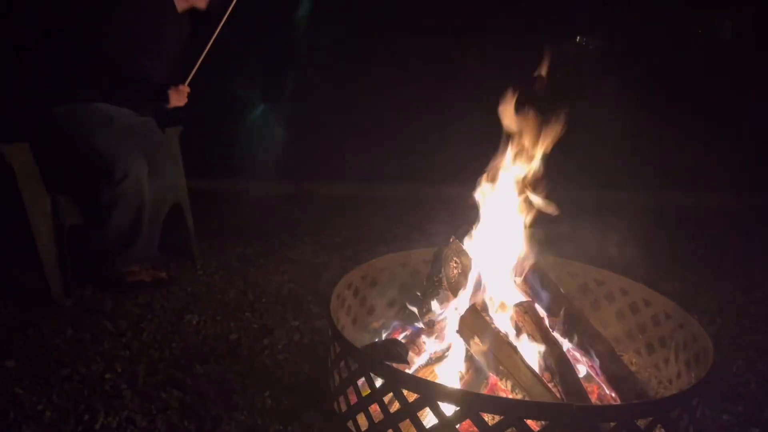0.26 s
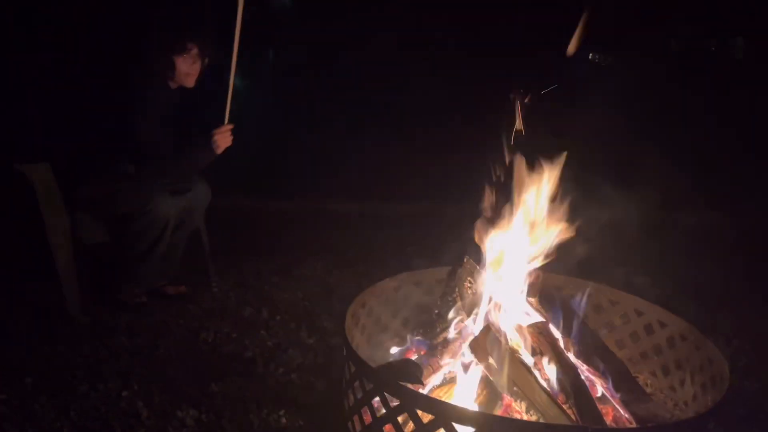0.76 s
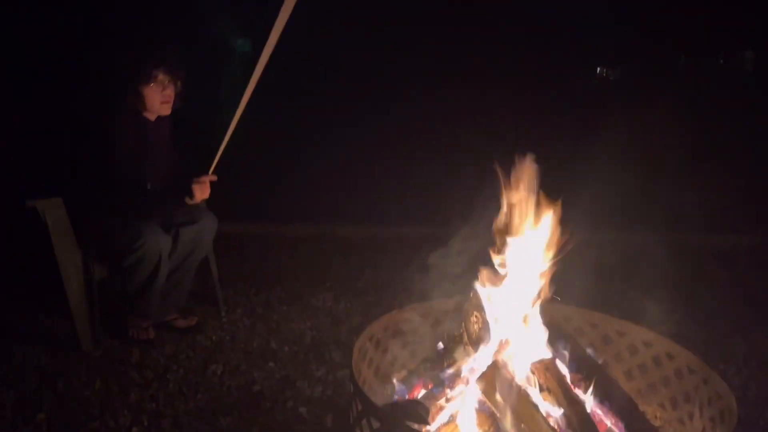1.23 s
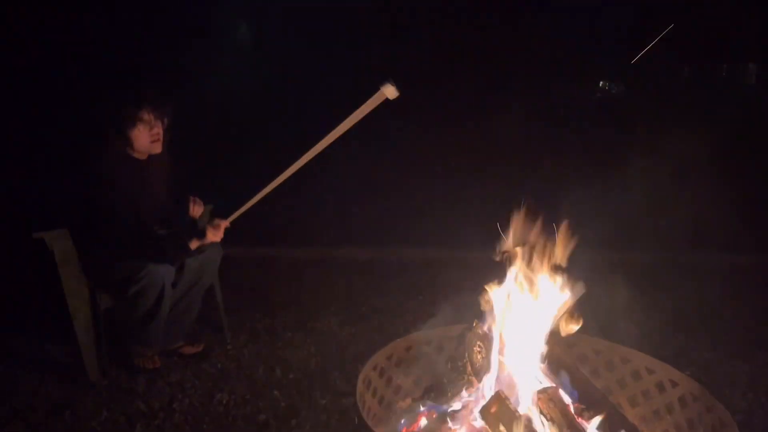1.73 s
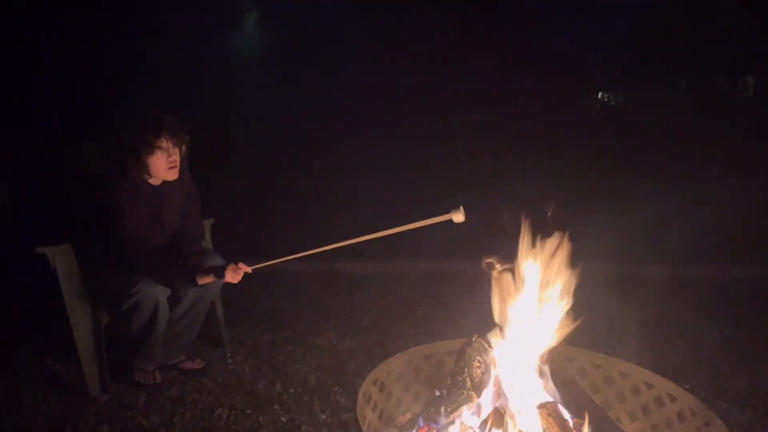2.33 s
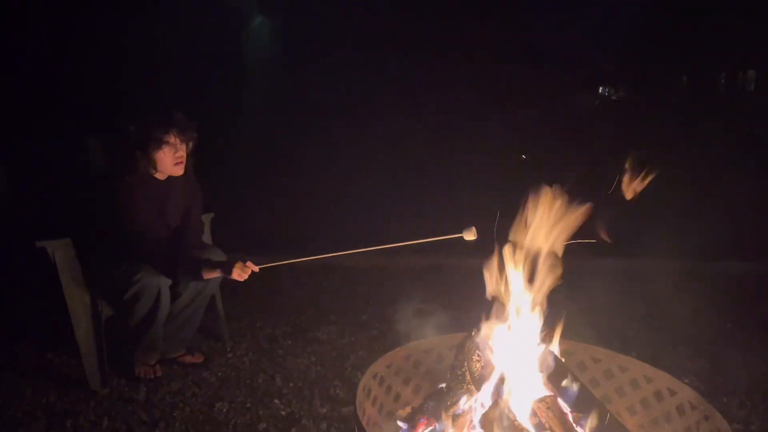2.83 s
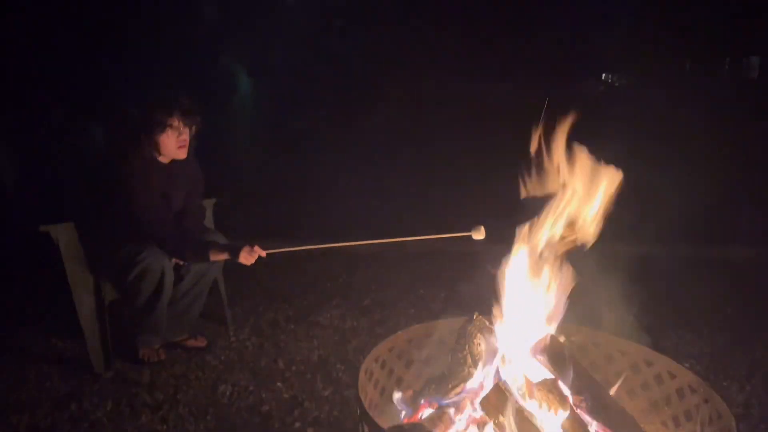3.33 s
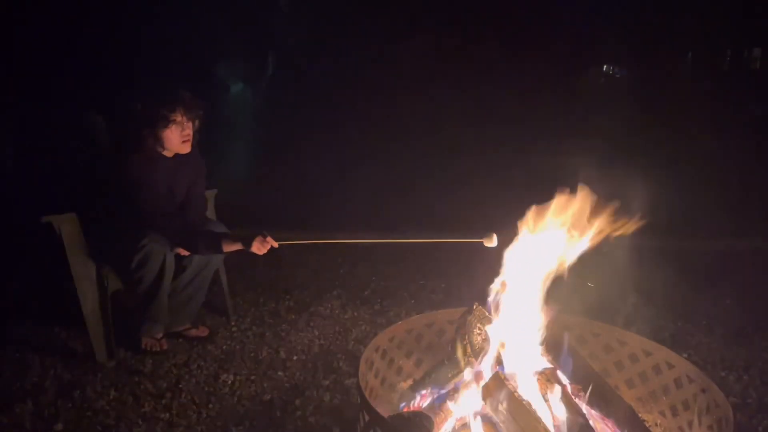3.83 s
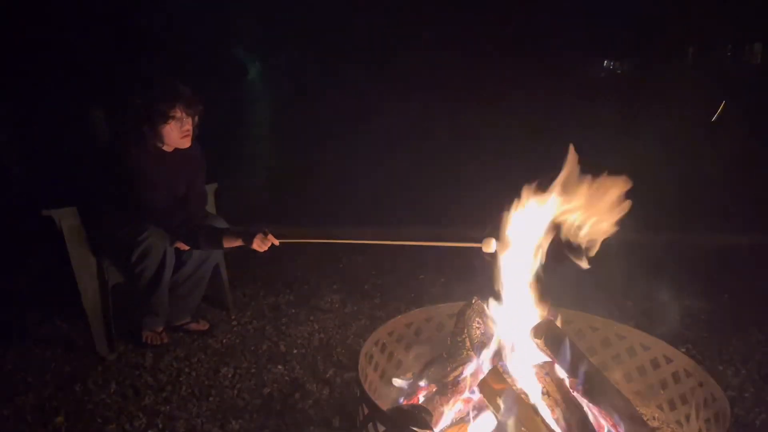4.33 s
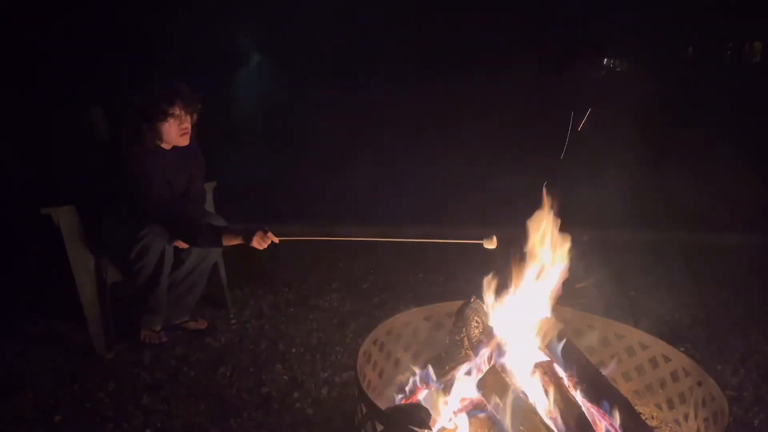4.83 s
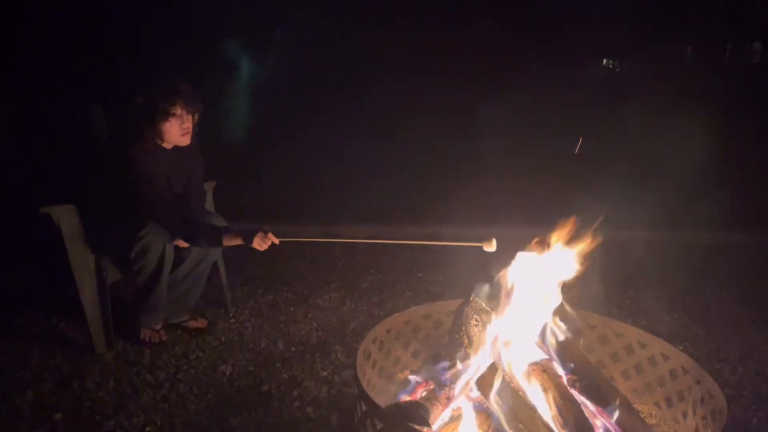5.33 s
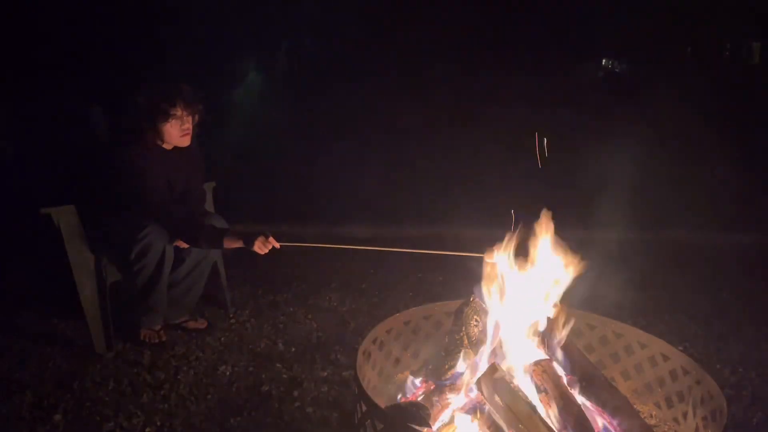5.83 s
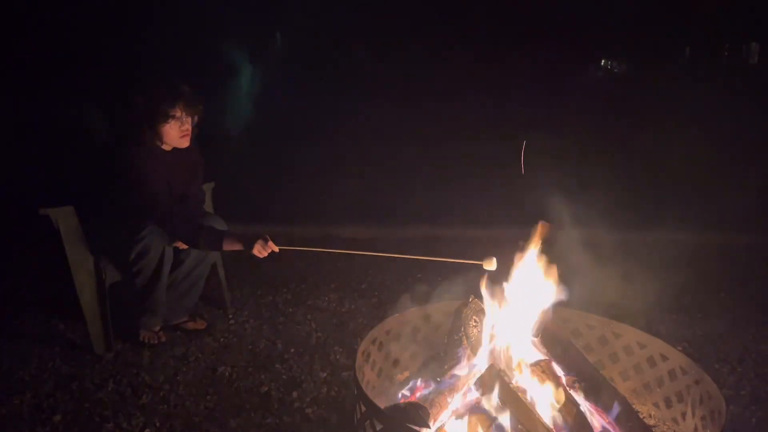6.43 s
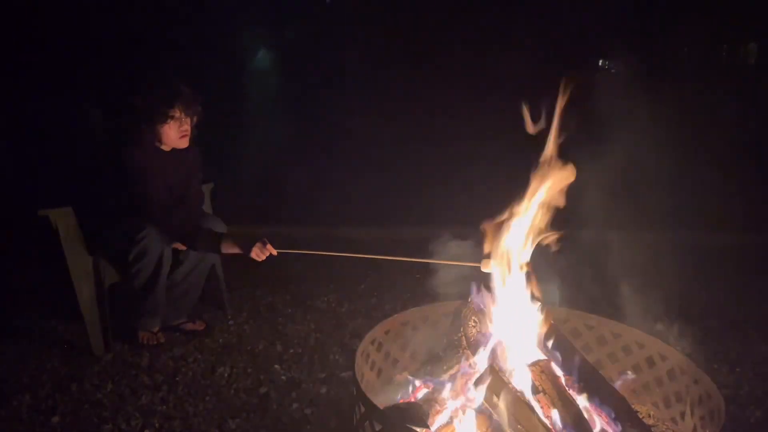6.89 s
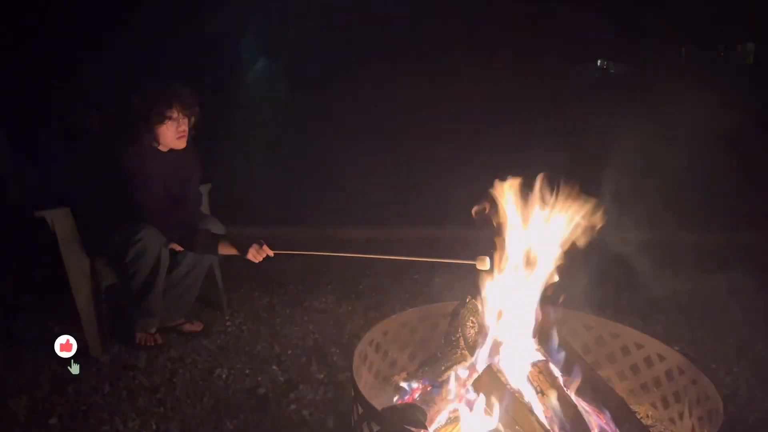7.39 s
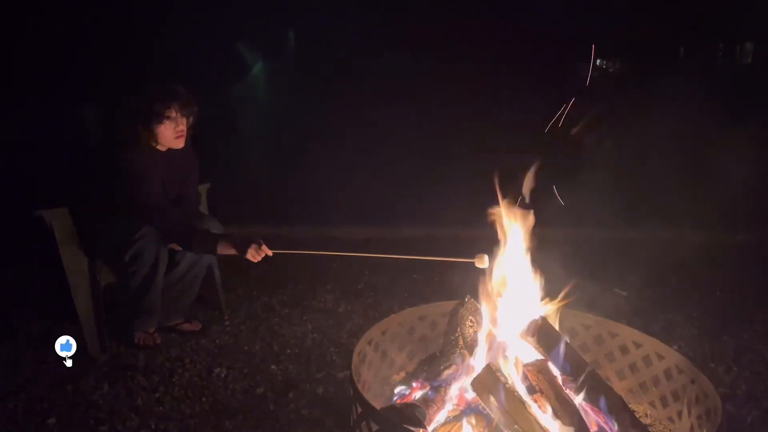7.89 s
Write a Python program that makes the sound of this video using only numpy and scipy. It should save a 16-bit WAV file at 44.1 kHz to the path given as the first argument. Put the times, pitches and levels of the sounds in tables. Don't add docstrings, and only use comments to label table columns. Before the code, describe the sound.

Outdoor night fire crackling with bright pops and two heavy wood splits, amid cricket chirps, high insect rasping and two rising frog trills.

```python
import sys
import numpy as np
from scipy import signal
from scipy.fft import rfft, irfft, next_fast_len
from scipy.io import wavfile
from scipy.ndimage import uniform_filter1d, map_coordinates

SR = 44100
rng = np.random.default_rng(int(sys.argv[2]) if len(sys.argv) > 2 else 0)


def digitize_waveform(pressure):
    field = np.atleast_2d(pressure).T
    bounded = np.clip(field, -1, 1)
    quanta = np.round(bounded * 32767).astype(np.int16)
    wavfile.write(sys.argv[1], SR, quanta)


def nominal_scale(level):
    x = np.asarray(level, float) / 20
    return 10 ** x


N = 359415


def unit(x):
    return x / np.sqrt(np.mean(x ** 2) + 1e-20)


def along(points, hz):
    f, v = np.transpose(points)
    return np.interp(np.log(hz + 1), np.log(f + 1), v)


def curves(rows):
    s, *cols = np.transpose(rows)
    return [np.interp(np.arange(N) / SR, s, c) for c in cols]


def wobble(rate):
    knots = rng.standard_normal(int(N * rate / SR) + 4)
    return map_coordinates(knots, [np.arange(N) * rate / SR])


def signs():
    return np.sign(rng.standard_normal(N))


def coloured(x, db_of):
    m = 2 * next_fast_len(N // 2 + 8192)
    cepstrum = irfft(np.log(nominal_scale(db_of(np.fft.rfftfreq(m, 1 / SR))) + 1e-6), m)
    cepstrum[1:m // 2] *= 2
    cepstrum[m // 2 + 1:] = 0
    return irfft(rfft(x, m) * np.exp(rfft(cepstrum)), m)[:N]


def humps(modes, hz):
    return sum(db * np.exp(-((hz - centre) / width) ** 2) for centre, width, db in modes)


def band(x, lo_hz, hi_hz):
    return signal.sosfilt(signal.butter(3, [lo_hz, hi_hz], "bandpass", fs=SR, output="sos"), x)


def laid(times, grains):
    at = np.round(np.asarray(times) * SR).astype(int)[:, None] + np.arange(grains.shape[1])
    return np.bincount(np.clip(at, -1, N).ravel() + 1, grains.ravel(), N + 2)[1:N + 1]


def bursts(times, db, t60, rise):
    t = np.arange(min(SR // 16, int(SR * np.max(t60)))) / SR
    fall = nominal_scale(np.reshape(db, (-1, 1)) - 60 * t / np.reshape(t60, (-1, 1)))
    return laid(times, fall * (1 - np.exp(-t / rise)))


def chirps(times, db, glide_hz, length, soft):
    u = np.linspace(0, 1, int(length * SR))
    stretch = 1 + 0.0081 * rng.standard_normal((len(times), 1))
    phase = 2 * np.pi * np.cumsum(np.interp(u, np.linspace(0, 1, len(glide_hz)), glide_hz)) / SR
    fade = signal.windows.tukey(len(u), soft)
    return laid(times, nominal_scale(np.reshape(db, (-1, 1))) * fade * np.sin(stretch * phase))


def runs(rows, per_s):
    s = np.concatenate([np.linspace(a, b, round((b - a) * per_s) + 1) for a, b in rows])
    return s + rng.normal(0, .003, len(s))


def trees(x):
    # pitch in Hz, time to fall by 60 dB in seconds.
    echo_t60 = [(300, 0.98), (2200, 1), (5000, 0.39), (12000, 0.085)]
    hz, t, z = signal.stft(rng.standard_normal(SR), SR, nperseg=256)
    swell = (1 - np.exp(-t / 0.032)) ** 2
    fall = nominal_scale(-60 * t / along(echo_t60, hz)[:, None])
    tail = signal.istft(z * swell * fall, SR, nperseg=256)[1]
    return signal.fftconvolve(x, tail / np.linalg.norm(tail))[:N]


def crickets():
    # first chirp in seconds, last chirp in seconds.
    low_runs = [(.087, 0.6), (.935, 1.62), (1.94, 3.6), (3.095, 4.05), (4.249, 5.9), (5.15, 6.615),
                (6.76, 7.2), (7.34, 8)]
    # first chirp in seconds, last chirp in seconds.
    high_runs = [(.013, 1.785), (2.012, 3.745), (3.97, 3.97), (4.17, 5.133), (5.245, 5.445), (5.644, 7.375),
                 (7.52, 8.0)]
    # time in seconds, level of the far chorus in dB.
    chorus = [
        (0.0, -34),
        (0.54, -35.5),
        (6.65, -38),
        (8.15, -33.5),
    ]
    sag_hz = np.array([0, -20, -80, -190, -350])
    low_s = runs(low_runs, per_s=6.85) + .007
    high_s = runs(high_runs, per_s=6.25)
    low = chirps(low_s, rng.normal(-39, 1.2, len(low_s)), 4260 + sag_hz, length=0.043, soft=0.5)
    high = chirps(high_s, rng.normal(-42, 1.5, len(high_s)), 4580 + sag_hz, length=0.047, soft=0.6)
    visitor = chirps([7.01, 7.17], [-44, -39], [4950, 4930, 4900], length=0.12, soft=0.2)
    crowd = 0
    for hz, db in [(4250, 3.0), (4380, 2.5), (4480, 0.5), (4600, -1.5), (4720, -1.5),
                   (4850, -3.5), (5000, -3), (5150, -2), (5300, -2.5)]:
        when, size = rng.random((150, 2)).T
        crowd = crowd + chirps(when * N / SR, db + 5 * size, hz + sag_hz, length=0.03885, soft=0.36)
    low_flutter = nominal_scale(2.5 * wobble(110) - 1)
    high_flutter = nominal_scale(2.5 * wobble(110) - 1)
    far = nominal_scale(curves(chorus)[0] - 6.0) * unit(crowd)
    return low_flutter * (low + visitor) + high_flutter * high + far


def katydid():
    # peak of the swell in seconds, rise in seconds, level in dB.
    swells = [(.288, .066, -17.5), (.666, 0.094, -34), (.969, 0.082, -18), (1.182, 0.049, -29),
              (1.69, 0.084, -18.5), (1.953, 0.081, -34), (2.325, 0.092, -24), (2.761, 0.079, -21),
              (2.897, 0.022, -40), (3.2, 0.12, -24), (3.6, 0.051, -21), (4.065, 0.096, -23),
              (4.274, 0.061, -21.5), (4.763, 0.085, -22), (5.201, .068, -21), (5.65, 0.082, -21.5),
              (6.025, 0.078, -21), (6.466, 0.089, -22.5), (6.914, 0.068, -21), (7.361, .12, -28),
              (7.592, 0.11, -21.5), (8.03, 0.063, -22.5)]
    # pitch in Hz, wander in Hz, level in dB.
    wing_rings = [(13950, 220, -12.5), (11400, 200, -24)]
    fall_s = 0.066
    t = np.arange(0, N + SR, 64) / SR

    def swell(sharp):
        slow = 0
        for s, rise, db in swells:
            distance = np.abs(t - s) / np.where(t < s, rise, fall_s)
            slow = slow + nominal_scale(db - 6.67 * distance ** sharp)
        return np.interp(np.arange(N) / SR, t, slow)

    when, force = rng.random((2400, 2)).T
    strokes = 1.2 + bursts(when * N / SR, 6 * force - 5, .006, rise=0.00069)
    lagging = np.roll(strokes, 300)
    upper = unit(strokes * band(rng.standard_normal(N), 11830, 15400))
    lower = unit(lagging * band(rng.standard_normal(N), 10970, 11460))
    rings = 0
    for hz, wander_hz, db in wing_rings:
        phase = 2 * np.pi * np.cumsum(hz + wander_hz * wobble(5.5)) / SR
        rings = rings + nominal_scale(db) * wobble(260) * np.sin(phase)
    upper_level = nominal_scale(-5.0) * swell(sharp=1.34) + nominal_scale(-77)
    lower_level = nominal_scale(-19) * swell(sharp=0.85) + nominal_scale(-63.0)
    return swell(sharp=2.1) * rings + upper_level * upper + lower_level * lower


def frog():
    # start in seconds, level in dB.
    trills = [
        (-.085, -15),
        (1.8666, -17),
    ]
    # settled level in dB, extra dB at the start, notes it takes to settle.
    throat = (-17, 10.4, 1.6)
    # time in seconds, level in dB.
    lead = (1.7, -39)
    gap_s, gap_grows_s = .03976, .000156
    k = np.arange(13)
    start, level_db = np.transpose(trills)[:, :, None]
    s = (start + gap_s * k + gap_grows_s * k ** 2).ravel()
    db = level_db - 0.34 * k - 2.5 * (k == 0) - 8 * (k == k[-1])
    db = (db + rng.normal(0, 1.0, db.shape)).ravel()
    low_db = db + np.tile(throat[0] + throat[1] * np.exp(-k / throat[2]), len(trills))
    heard = s > -gap_s / 2
    s, db, low_db = s[heard], db[heard], low_db[heard]
    sac = chirps(s, db - 3, [1600, 1880, 2060, 2230, 2500, 2680], length=.029, soft=.45)
    s, low_db = np.append(s, lead[0]), np.append(low_db, lead[1])
    call = sac + chirps(s + .009, low_db + 2, [1030, 1115, 1250, 1340], length=.02, soft=.9)
    ground, shed, fence = (np.pad(call, (int(delay_s * SR), 0))[:N] for delay_s in (.003, .011, .028))
    return nominal_scale(1.1 * wobble(150)) * call + .15 * ground + .2 * shed + .2 * band(fence, 2150, 2900)


def flames():
    # time in seconds, level of the rush in dB.
    flare = [
        (0.0, -31.5),
        (1.66, -35),
        (2.09, -32),
        (2.41, -36),
        (3.4, -35),
        (6.94, -36),
        (8.15, -33.5),
    ]
    # pitch in Hz, strength of the roar there in dB.
    roar_colour = [(15, -3), (25, -89), (50, -18), (92, -8.5), (119, -9.5), (151, 0), (188, -7.5),
                   (211, -10.5), (236, -21.5), (300, -28.5), (390, -41), (660, -120)]
    # pitch in Hz, strength of the rush there in dB.
    rush_colour = [(150, -37.5), (270, 5.5), (700, -0.5), (1300, -10), (2500, -13.5), (5000, -15),
                   (9000, -17), (16000, -18.5)]
    roar_db = -19 - 0.22 * np.arange(N) / SR
    rush_db = curves(flare)[0] + 1.5
    roar = unit(coloured(rng.standard_normal(N), lambda hz: along(roar_colour, hz)))
    hiss = coloured(rng.standard_normal(N), lambda hz: along(rush_colour, hz))
    rush = unit(nominal_scale(1.83 * wobble(18)) * hiss)
    when, size, length = rng.random((600, 3)).T
    embers = bursts(when * N / SR, -47 + 11 * size ** 2, 0.0072 + 0.028 * length, rise=0.0001)
    crackle = embers * unit(band(rng.standard_normal(N), 2400, 10500))
    return nominal_scale(roar_db) * roar + nominal_scale(rush_db) * rush + crackle


def rustle():
    # time in seconds, level in dB.
    settling = [
        (0, -62.5),
        (.7, -35),
        (1.2, -44.5),
        (5.6, -46),
        (5.67, -36),
        (5.75, -44.5),
        (7.5, -44),
        (7.65, -37.5),
        (8.15, -35.5),
    ]
    when, pitch, size = rng.random((3, 2500, 1))
    hz = 600 * 5.5 ** pitch
    t = np.arange(SR // 60) / SR
    grains = nominal_scale(21.0 * size ** 2 - 60 * t * hz / 12) * np.sin(2 * np.pi * hz * t)
    return nominal_scale(curves(settling)[0]) * unit(laid(when[:, 0] * N / SR, grains))


def coals():
    # time in seconds, pitch in Hz, level in dB.
    bits = [(5.285, 2640, -27), (5.658, 1060, -29), (5.679, 1290, -31), (7.58, 1810, -35),
            (7.621, 1250, -30), (7.635, 1460, -26.5), (7.654, 2250, -33), (7.677, 2340, -25),
            (7.685, 1400, -30.5), (7.744, 1380, -35), (7.754, 1800, -27), (7.766, 2500, -34),
            (7.801, 2300, -31), (7.889, 930, -30), (7.9, 1140, -31), (7.91, 1340, -29), (7.912, 2950, -26),
            (7.957, 1350, -33), (7.993, 2900, -26), (8.005, 2500, -24), (8.06, 2700, -23),
            (8.103, 560, -35)]
    # time in seconds, level of the whistle in dB.
    whistle_level = [
        (1.0, -64),
        (1.15, -47),
        (1.3, -43),
        (1.46, -45),
        (1.5, -70),
    ]
    s, hz, db = np.transpose(bits)[:, :, None]
    t = np.arange(SR // 20) / SR
    grit = 0.65 * uniform_filter1d(rng.standard_normal((len(s), len(t))), size=6, axis=1)
    bend = 1 + rng.normal(0, 1.4, s.shape) * t
    tone = np.sin(2 * np.pi * hz * t * bend)
    fade = nominal_scale(db + 9.5 - 60 * t * hz / 38) * (1 - np.exp(-t / 0.001))
    clinks = laid(s[:, 0], fade * (tone + grit))
    t = np.arange(N) / SR
    whistle = np.sin(2 * np.pi * 3490 * t + 1.2 * wobble(60))
    whistle = whistle + .8 * np.sin(2 * np.pi * 3740 * t + 1.2 * wobble(60))
    return clinks + nominal_scale(curves(whistle_level)[0]) * (t > 1) * (t < 1.5) * whistle


def cracks():
    # time in seconds, level in dB.
    twigs = [(0.8717, -18.5), (0.9293, -21), (0.9566, -16), (2.818, -32), (2.8589, -23), (3.0667, -29),
             (3.2261, -26), (3.5723, -23.5), (3.7793, -22), (3.9444, -23), (4.0372, -34), (4.0734, -30),
             (4.2253, -28), (4.3088, -22), (4.813, -24.5), (5.033, -25), (5.1243, -18), (5.1972, -23),
             (5.296, -23), (5.313, -25), (5.7339, -29), (6.0833, -26), (6.618, -19.5), (6.6486, -30),
             (6.6827, -33), (6.771, -35), (6.787, -24), (6.9074, -28), (7.1846, -26), (7.2347, -22),
             (7.9298, -17), (8.0066, -20)]
    # time in seconds, level in dB.
    bright_tops = [(0.4409, -6), (1.423, -6.5), (2.9197, -5), (2.9901, -11), (3.3762, -21), (3.8911, -15),
                   (4.4293, -14), (4.629, -10), (5.025, -14), (5.678, -1), (6.543, -5.5), (6.955, -17),
                   (7.9089, -15)]

    def clicks(rows, extra_db, lo_hz, hi_hz):
        s, db = np.transpose(rows)
        return band(bursts(s, db + extra_db, .012, rise=0.00023) * signs(), lo_hz, hi_hz)

    return clicks(twigs, 8.2, 950, 3340) + clicks(bright_tops, -1, 9200, 14600)


def knocks():
    # time in seconds, level in dB, pitch in Hz.
    shifts = [(.12, -33, 938), (1.161, -27, 603), (1.232, -26.5, 626), (1.27, -32, 410),
              (1.444, -33.5, 418), (1.598, -33, 580), (1.835, -24.5, 1040), (1.883, -28, 1150),
              (2, -16.5, 895), (2.14, -29, 990), (3.055, -24, 505), (3.347, -20.5, 650),
              (3.691, -26.5, 420), (3.889, -26, 503), (4.325, -24, 1070), (4.886, -29, 527),
              (5.096, -31, 504.5), (5.34, -11.5, 1320), (5.645, -25.5, 890), (6.484, -26, 620),
              (6.523, -34, 493), (6.678, -25.5, 504), (7.069, -30.5, 653), (7.611, -28, 884),
              (7.756, -27, 604), (7.845, -29, 920), (7.869, -26, 676), (7.929, -26, 840), (8.005, -25, 650),
              (8.094, -24.5, 1205)]
    s, db, hz = np.transpose(shifts)[:, :, None]
    t60 = np.where(db > -17, 0.064, 0.023)
    t = np.arange(SR // 12) / SR
    fade = nominal_scale(db + 9.5 - 60 * t / np.minimum(t60, .04)) * (1 - np.exp(-t / 0.001))
    tone = laid(s[:, 0], fade * np.sin(2 * np.pi * hz * t))
    noise = unit(band(rng.standard_normal(N), 270, 1230))
    return tone + bursts(s[:, 0], db + 7.5, t60, rise=0.0023) * noise


def blows():
    # time in seconds, level in dB, time to fall by 60 dB in seconds, echo level in dB.
    splits = [
        (1.996, 0, 0.063, -12.5),
        (5.3387, 2.5, 0.021, -8),
    ]
    s, db, t60, echo_db = np.transpose(splits)
    wood = signs()
    return [band(bursts(s, level_db + 2.0, t60, rise=0.0023) * wood, 710, 3260)
            for level_db in (db, db + echo_db)]


def pops():
    # time in seconds, snap in dB, crack in dB, ring in dB
    wood_pops = [(0.178, -9, -14, -8), (.2898, -20.5, -11, 8), (0.3563, -13, -3, -4),
                 (0.4405, -7.5, -31, -27), (0.685, -11, -4, -3.5), (0.9057, -12.5, -12, -4.5),
                 (0.9725, -11, -8, 7.5), (1.423, -23, -30, -22), (1.5493, -10, -8.5, -1.5),
                 (1.9966, -13.5, 2, 2.5), (2.92, -9, -35, 1.5), (2.96, -14, -16, -1),
                 (2.9902, -16.5, -11, -8), (3.6905, -8.5, -14.5, 1.5), (3.8915, -8, -11, -2.5),
                 (3.9916, -19, -18, 5.5), (4.377, -7.5, -17, 0.5), (4.4281, -6.5, -14.5, -4),
                 (4.4652, -11, -22, 1), (4.627, -4.5, -7, -3), (4.924, -29.5, -1, 17),
                 (5.3389, -17, 13, 7.5), (5.439, -11.5, -16, -11), (5.467, -13, -5, -12),
                 (5.678, -24, -20, -21), (5.844, -14.5, -15, 2), (6.5433, -17.5, -18, 7.5),
                 (6.956, -12, -12.5, 3), (7.8109, -17.5, -2, 8), (7.91, -15, -20, -23),
                 (0.1507, -15.5, -20, 4), (0.5307, -16.5, -22, -1), (0.5538, -15.5, -25, -2),
                  (0.5786, -21, -20, -5), (0.71, -17, -27, -11), (0.7395, -16, -16, -13),
                  (0.8777, -14.5, -20, -18), (1.1191, -16.5, -20, -7), (1.354, -19, -18, -9),
                  (1.7863, -20, -22, -11), (2.329, -18, -20, 0), (2.4935, -21, -13, -19),
                  (2.9532, -18, -20, -5), (3.0647, -16.5, -22, -9), (3.3752, -20.5, -11, 1.5),
                  (3.4447, -18, -20, -1), (3.7227, -21, -20, -7), (3.8387, -22, -20, 0),
                  (5.23, -19, -18, -1), (5.256, -21, -14, 1), (5.4265, -14, -20, -5),
                  (5.6403, -18.5, -20, -6), (6.0808, -18.5, -20, 2), (6.417, -19.5, -20, -3),
                  (6.5594, -22.5, -20, -2), (7.1467, -23, -20, -5), (7.4724, -17, -20, -5),
                  (7.5553, -15, -20, -1.5), (7.6416, -12.5, -20, -1), (8.115, -15, -23, -8),
                 (0.0936, -24, 5, 1.5), (0.3002, -14.5, -4, -0.5), (1.161, -17.5, -8, -2.5),
                   (1.5778, -16, -9, -7), (1.6658, -22.5, -8, -4), (2.0746, -18.5, -1, -2),
                   (2.177, -22, 1, 5.5), (2.2363, -22, 0, -1), (2.8155, -25, -5, 4),
                   (2.8465, -25.5, -10, 6), (3.1198, -27.5, -3, 12), (3.1585, -16.5, -0.5, 0.5),
                   (3.345, -26.5, -5, 12), (3.411, -25, -10, 4), (3.472, -23.5, -4, -1),
                   (3.613, -20.5, -7, 8), (4.0367, -25, -4, 11), (4.3274, -18.5, -1.5, 3.5),
                   (4.9006, -19.5, -1.5, 2), (5.4143, -23, -10, 0), (5.9696, -20.5, -5.5, 1),
                   (6.106, -23.5, -6, 0), (6.1494, -30, -2, 5), (6.5265, -27, -18, 3),
                   (7.1727, -23, -6, -3), (7.3852, -24.5, -6, -6), (7.451, -27, -9, 3),
                   (7.4906, -20.5, -6, 5), (7.5196, -17.5, -5.5, 3), (7.9317, -16.5, -5, -5)]
    s, snap_db, crack_db, ring_db = np.array(wood_pops).T
    air_db = snap_db - 6.5 + rng.normal(0, 2.4, len(s))
    layers = [(snap_db + 1.5, 5300, 10800, .011),
              (snap_db + crack_db + 11.0, 1700, 2900, .02),
              (snap_db + ring_db + 3.5, 2900, 5300, .014),
              (air_db, 10800, 15700, .006)]
    total = 0
    for db, lo_hz, hi_hz, t60 in layers:
        front = bursts(s, db + 5, .007, rise=.0003)
        tail = bursts(s, db - 11.5, t60 * nominal_scale(0.23 * (db + 57.0)), rise=0.0014)
        total = total + band((front + tail) * signs(), lo_hz, hi_hz)
    return total


def scene():
    # pitch in Hz, width in Hz, boost in dB.
    hollow = [(2350, 260, 12), (1330, 250, 3)]
    fire = pops() + knocks() + cracks()
    voice, insects = frog(), crickets()
    split, split_far = blows()
    far = coloured(nominal_scale(-26) * fire + split_far + nominal_scale(-30) * voice, lambda hz: humps(hollow, hz))
    echo = trees(far + nominal_scale(-18) * insects)
    return (fire + split + voice + insects + echo + coals() + rustle() + flames() + katydid())[None]


def top_cut(x):
    return signal.sosfilt(signal.butter(12, 16850, fs=SR, output="sos"), x)


def record(dry):
    # pitch in Hz, width
    # in Hz, change in dB.
    port = [(1634, 106, -6.5), (2250, 45, 6), (3900, 300, 2), (4543, 440, 12), (6120, 260, 2),
            (7000, 30, -12), (7080, 27, -14), (7490, 97, 9.5), (8000, 68, -11), (9240, 40, -2),
            (9500, 150, 2.5), (9550, 70, -29), (9950, 130, 0.5),
            (0, 22, -40), (3110, 90, -5), (5600, 130, -7), (10280, 90, -10), (11150, 70, -6),
                (11700, 400, 6), (12400, 200, -8), (13100, 200, -8), (11590, 50, 3), (11840, 45, 3),
                (12000, 40, 2), (12750, 60, 2), (14320, 40, -4), (14500, 40, -4), (14800, 40, -4),
                (13600, 120, 3), (13870, 60, -6), (14150, 300, 9), (14650, 300, 6), (15350, 80, -4),
                (15550, 120, 2)]
    x = coloured(dry[0], lambda hz: humps(port, hz) - 70 * (hz > 15760))
    excess = np.maximum(0, uniform_filter1d(x ** 2, size=440) - .07)
    release = np.exp(-np.arange(SR // 2) / SR / 0.13)
    duck = nominal_scale(-.14 * signal.fftconvolve(excess, release)[:N])
    return top_cut((x * duck)[None])


dry = scene()
out = record(dry)
digitize_waveform(out)
```